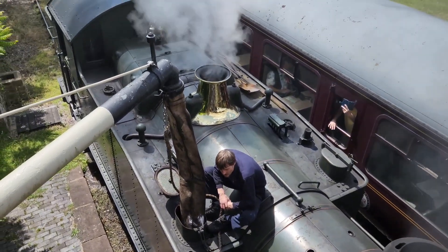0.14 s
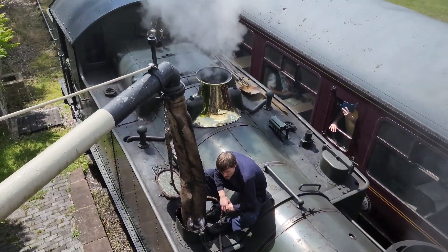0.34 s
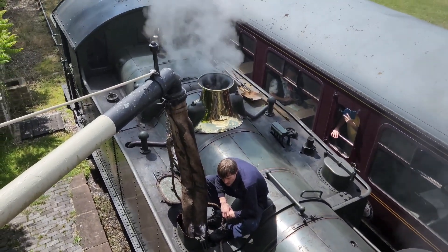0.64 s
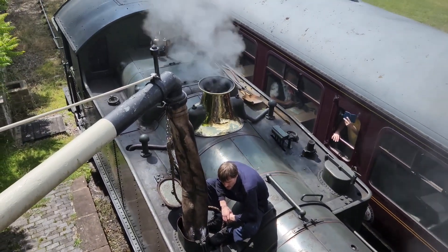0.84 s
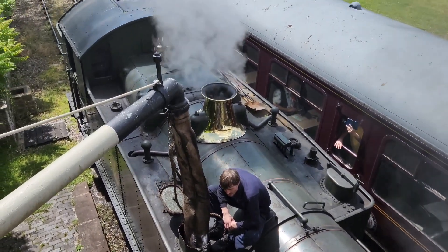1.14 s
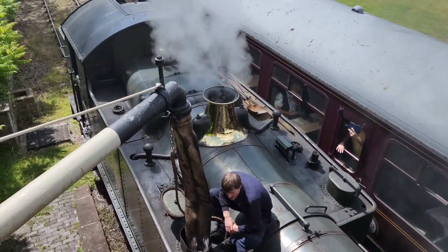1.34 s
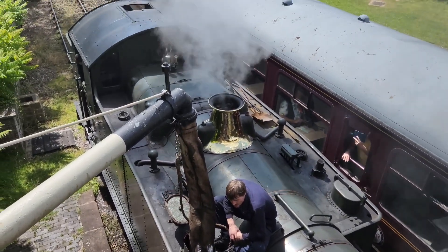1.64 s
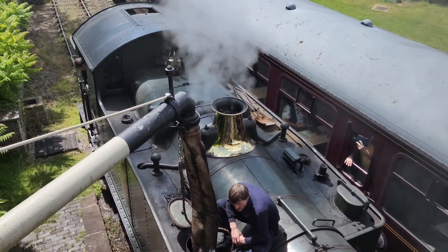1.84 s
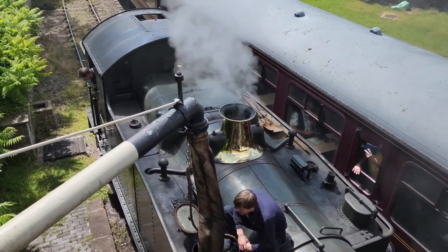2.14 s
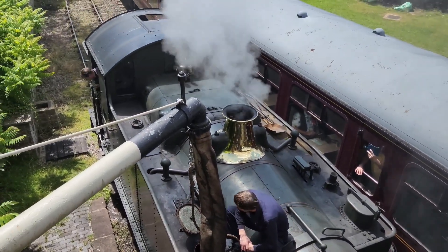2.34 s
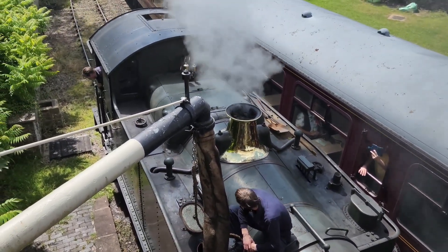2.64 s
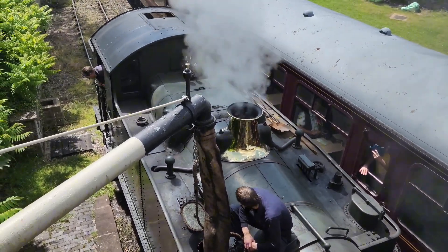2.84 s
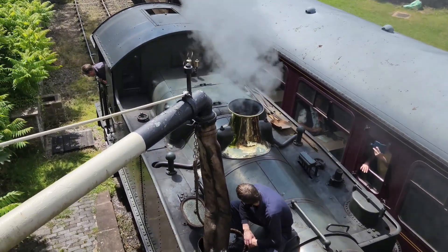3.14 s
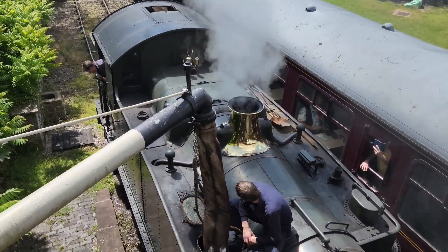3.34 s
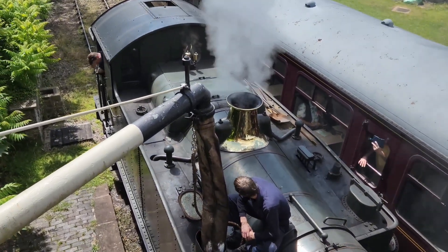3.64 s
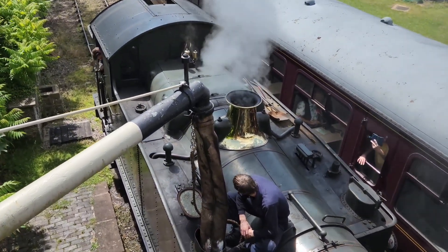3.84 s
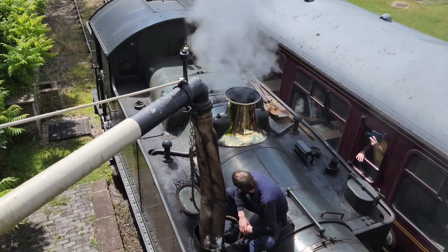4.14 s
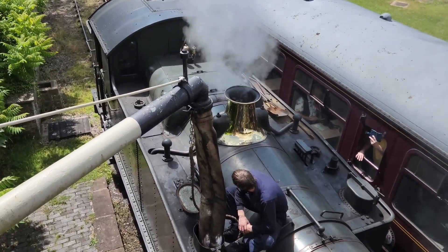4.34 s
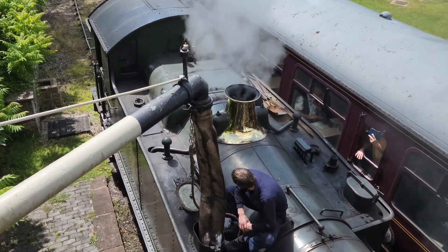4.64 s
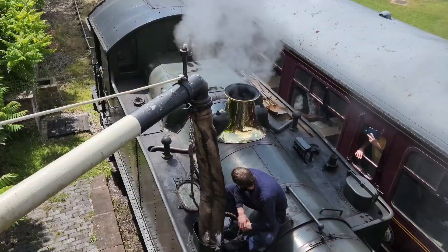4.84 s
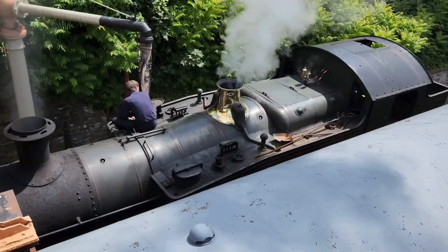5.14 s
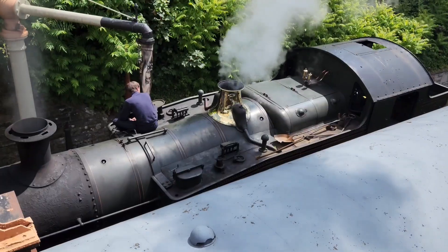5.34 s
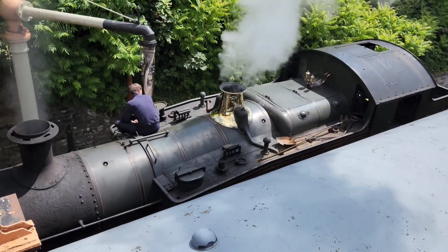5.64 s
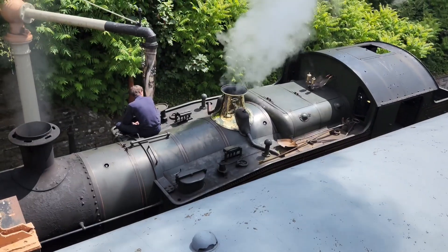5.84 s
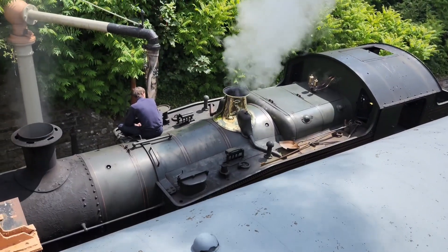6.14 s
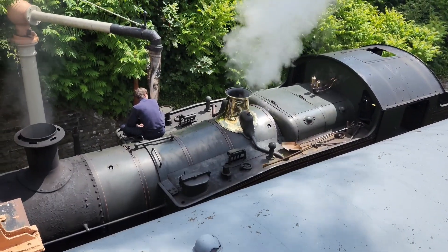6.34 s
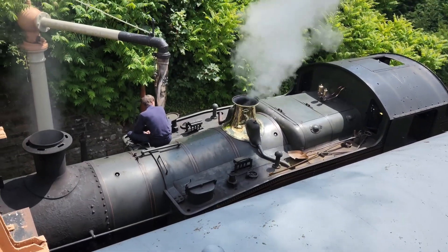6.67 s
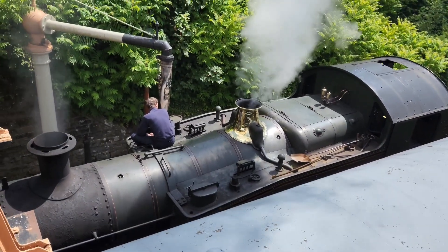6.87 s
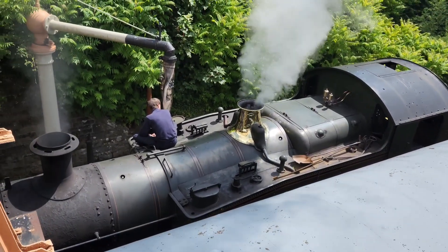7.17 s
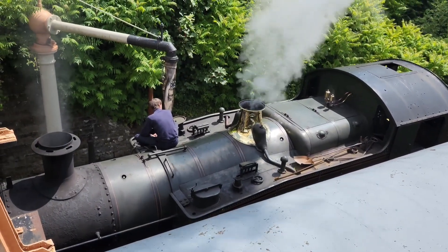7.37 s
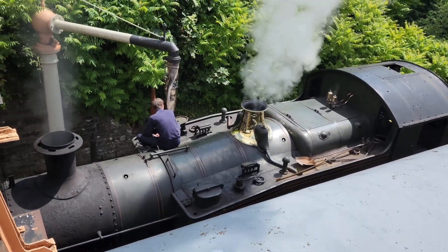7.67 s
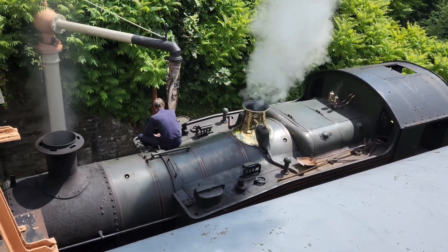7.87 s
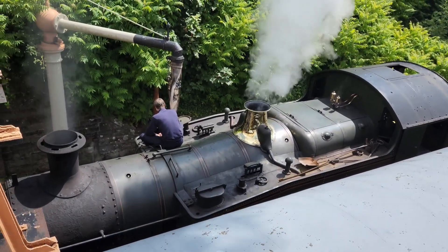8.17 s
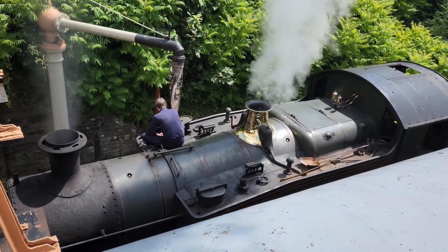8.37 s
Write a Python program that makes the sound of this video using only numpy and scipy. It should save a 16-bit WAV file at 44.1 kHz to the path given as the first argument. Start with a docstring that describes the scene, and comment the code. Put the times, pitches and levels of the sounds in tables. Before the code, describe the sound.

Continuous roaring steam escapes from safety valves, rumbling underneath and wavering with soft low tones, briefly cut before continuing from another position.

```python
"""A standing steam locomotive blows off through its safety valves, heard from above: filtered noise is the jet.
Front, 0-5.05 s: hissing jet, rumbling plume, faint bonnet tone swelling into hoots, three low air buffets.
The sound drops out for about 46 ms after a short decaying tail.
Side, from 5.1 s: the jet in another colour, a hollow ring at 5.4 s, a quick microphone swing at 6.4 s and
one more buffet. Slow turning of the two microphone ports shifts lag, balance and treble throughout."""
import sys
import numpy as np
from scipy import signal
from scipy.fft import rfft, irfft
from scipy.io import wavfile
from scipy.ndimage import uniform_filter1d, map_coordinates

SR = 44100
rng = np.random.default_rng(int(sys.argv[2]) if len(sys.argv) > 2 else 0)


def to_wav(s):
    """Save 16-bit WAV."""
    ch = np.atleast_2d(s).T  # columns
    pcm = np.round(np.clip(ch, -1, 1) * 32767)  # PCM
    wavfile.write(sys.argv[1], SR, pcm.astype(np.int16))


N = 375291
TIME = np.arange(N) / SR
FREQ = np.maximum(np.arange(N // 2 + 1) * SR / N, 1)

FRONT_END_S, SIDE_START_S = 5.054, 5.1005
TOP_HZ = 15750
JET_DB_PER_HZ = -55  # noise density before colour and resonances

# turning of the microphone: (time [s], lag of left port behind right [ms])
PORT_LAG_MS = [(0.0, -0.014), (1.3, -0.0094), (2.1, 0.031), (2.7, 0.042), (4.2, -0.014), (5.2, -0.00033),
               (5.8, 0.021), (6.45, 0.031), (6.7, 0.055), (7.05, 0.056), (7.4, 0.039), (8.5, 0.046)]


def amp(db):
    """Decibels to gain."""
    return 10 ** (np.asarray(db) / 20)


def curves(table):
    """Columns of a time table, interpolated at every sample."""
    time_s, *columns = np.transpose(table)
    return [np.interp(TIME, time_s, column) for column in columns]


def spectra(table):
    """Columns of a frequency table, interpolated on a log-frequency axis."""
    hz, *columns = np.transpose(table)
    return np.array([np.interp(np.log(FREQ), np.log(hz), column) for column in columns])


def walk(rate_hz):
    """Random levels, each held 1 / rate, joined by ramps; zero mean, standard deviation 1."""
    hold = max(int(SR / rate_hz), 2)
    levels = rng.standard_normal(N // hold + 2)
    steps = np.repeat(levels, hold)[rng.integers(hold):][:N]
    smooth = uniform_filter1d(steps, hold)
    return (smooth - smooth.mean()) / smooth.std()


def below(x, edge_hz):
    """Zero-phase low-pass with a soft edge, -6 dB at edge_hz."""
    return irfft(rfft(x) / (1 + (FREQ / edge_hz) ** 4), N)


def narrow(hz, width_hz):
    """Noise through one narrow resonance, width taken at -6 dB; rms 1."""
    resonance = 1 / (1 + (2 * (FREQ - hz) / width_hz) ** 2)
    x = irfft(rfft(rng.standard_normal(N)) * resonance, N)
    return x / x.std()


def buffets(hz=42, width_hz=30, apart_db=-7):
    """Puffs of air thud softly on the ports: shared low noise plus a weaker opposed part."""
    # low puffs: (peak time [s], half-length to 1/e [s], rms level of shared part at peak [dB])
    puffs = [(1.15, .25, -42), (2.2, .2, -50), (4.75, .2, -51), (6.9, .35, -43)]
    swell = sum(amp(db) * np.exp(-((TIME - peak_s) / length_s) ** 2) for peak_s, length_s, db in puffs)
    shared = narrow(hz, width_hz)
    opposed = amp(apart_db) * np.outer([1, -1], narrow(hz, width_hz))
    return swell * (shared + opposed)


def ring(width_hz=32, peak_s=5.38, length_s=0.077):
    """Two narrow noise bands swell and fade as a short hollow ring under the hiss."""
    # ring bands: (frequency [Hz], rms level at peak [dB])
    bands = [(482, -40), (545, -41)]
    tones = sum(amp(db) * narrow(hz, width_hz) for hz, db in bands)
    return tones * np.exp(-((TIME - peak_s) / length_s) ** 2)


def drone(hz=224, wander_hz=1.8, idle_db=-39, attack_s=0.047, release_s=0.13, pan_db=2.0):
    """The jet blows the bonnet like a bottle: a faint wavering sine that now and then swells and dies away."""
    # hoots: (hold start [s], hold length [s], rms level before pan [dB])
    hoots = [(0.204, 0.24, -31.5), (0.95, 0.2, -32.5), (1.326, 0.063, -27.5), (1.862, .1, -32.5),
             (2.86, 0.27, -36), (3.255, 0.13, -31.5), (3.552, 0.35, -32), (4.12, 0.57, -35.5),
             (4.778, 0.31, -33.5)]
    pitch_hz = hz + wander_hz * walk(5)
    tone = np.sqrt(2) * np.sin(2 * np.pi * np.cumsum(pitch_hz) / SR)
    swell = amp(idle_db)
    for start_s, hold_s, db in hoots:
        corners_s = np.cumsum([start_s - attack_s, attack_s, hold_s, release_s])
        swell = np.maximum(swell, amp(db) * np.interp(TIME, corners_s, [0, 1, 1, 0]))
    return tone * swell * amp(np.array([[pan_db], [-pan_db]]) / 2)


def jet(colour, resonances, likeness, low_depth=1, scatter=1, low_hz=2200):
    """Mixing noise of the jet at one place: a part shared by both ports and a part of opposite sign."""
    db = spectra(colour) + JET_DB_PER_HZ
    for hz, width_hz, left_db, right_db in resonances:
        depth = low_depth if hz < low_hz else 1
        bump = np.exp(-2 * ((FREQ - hz) / width_hz) ** 2)
        db = db + depth * np.outer([left_db, right_db], bump)
    alike = np.clip(1 - scatter * (1 - spectra(likeness)[0]), -1, 1)
    shared, scattered = rfft(rng.standard_normal((2, N)))
    ports = shared * np.sqrt(1 + alike) + np.outer([1, -1], scattered * np.sqrt(1 - alike))
    return irfft(ports * amp(db) * np.sqrt(SR) / 2, N)  # unit density per Hz at 0 dB


def front_jet():
    """Jet noise coloured as heard from the front."""
    # broad colour: (frequency [Hz], left [dB], right [dB])
    colour = [(25, -15.0, -14.9), (50, -4.5, -7), (96, 6, 3.5), (176, 5, 2.5), (302, -3, -7),
              (432, -8, -13), (764, -1.5, -6), (1410, -6.5, -1.5), (2210, 1.5, -2.4), (4530, 2.5, -1.8),
              (7000, -1.3, -2), (9800, -0.5, -4), (13000, -1, 0.7), (15800, 0.5, -2)]
    # bonnet, surface and port resonances: (frequency [Hz], width, 2 sigma [Hz], left [dB], right [dB])
    resonances = [(210, 23, 2.5, 2), (314, 27, 4, 4.5), (381.7, 17, 4.5, 11), (649, 50, 5, 7.5),
                  (855, 50, -5, -4), (1050, 81, 7.5, -5), (1235, 120, 7, 1.5), (1440, 38, 8, 6),
                  (1920, 270, 4.5, -4), (2110, 82, 2, 7), (2480, 76, 3.5, 7), (2960, 230, 1.5, 3),
                  (3830, 330, 0, 4.5), (4520, 365, -1.5, 4.5), (7270, 450, 6, 1.5), (8700, 900, 4, 2),
                  (9900, 720, -4, 2.5), (11534, 730, 1.5, 2)]
    # likeness of the ports: (frequency [Hz], correlation [-1..1])
    likeness = [(100, 1), (300, 0.9), (500, 0.89), (1200, 0.73), (1700, 0.5), (2200, 0.49), (5000, 0.61),
                (6800, 0.45), (8000, 0.27), (9400, 0.37), (11000, 0.71), (12700, 0.074), (15000, 0.54)]
    return jet(colour, resonances, likeness)


def side_jet(swing_s=6.42, swing_length_s=0.26):
    """Jet noise at the side; one microphone swing strengthens lower resonances and makes the ports more alike."""
    # broad colour: (frequency [Hz], left [dB], right [dB])
    colour = [(25, -14, -13), (50, -6, -4), (103, 3.5, 1), (184, 1, -1), (320, -2.0, -7.5),
              (427, -12, -15.5), (765, -5.5, -5), (1400, -3, -4), (2210, -2, -2.4), (4500, -2, -4),
              (7000, -0.5, -6.5), (10000, -0.6, -5.5), (13000, 0, -1.5), (15800, -2, -1.5)]
    # resonances before low_depth: (frequency [Hz], width, 2 sigma [Hz], left [dB], right [dB])
    resonances = [(769, 49, 5, 4), (1010, 170, 3, -3), (1210, 75, 7, 5.5), (1385, 220, -2.5, -9.5),
                  (1940, 200, 5, 3.5), (2430, 130, 6, 1), (2800, 198, 3, -1), (3570, 690, 3, 2.5),
                  (4690, 300, 3, 4), (5350, 280, 4.5, 2), (6260, 480, 3.5, 5), (7320, 590, 3.5, 4.5),
                  (8500, 820, 3, 3), (9600, 610, -6.5, 1.5), (11500, 590, -3, 4)]
    # likeness of the ports before scatter: (frequency [Hz], correlation [-1..1])
    likeness = [(100, 1), (300, 0.96), (480, 0.64), (800, 0.99), (1450, 0.8), (1800, 0.85), (3000, 0.62),
                (4500, 0.89), (7200, 0.21), (8400, 0.6), (9400, 0.91), (10000, 0.85), (11300, 0.16),
                (13000, 0.62), (15500, 0.7)]
    before = jet(colour, resonances, likeness, low_depth=0.8, scatter=1.05)
    after = jet(colour, resonances, likeness, low_depth=1.13, scatter=0.88)
    swung = np.clip((TIME - swing_s) / swing_length_s, 0, 1)
    return before * np.sqrt(1 - swung) + after * np.sqrt(swung)


def shimmer(x, depth_db, rate_hz, count=14):
    """Hot moving air bends the sound: neighbouring bands of the hiss fade and swell independently."""
    centres_hz = np.geomspace(800, TOP_HZ, count)
    spectrum, out = rfft(x), 0
    for share in np.eye(count):
        band = irfft(spectrum * np.interp(FREQ, centres_hz, share), N)  # triangular band
        out = out + band * amp(depth_db * walk(rate_hz))
    return out


def turbulence(steam, rumble_hz=500, surge_db=0.11, surge_hz=9, sputter_db=0.6, sputter_hz=55):
    """Big eddies rumble with the slow flow; the hiss surges and sputters as a whole."""
    # slow drift of jet strength: (time [s], plume rumble [dB], hiss [dB])
    flow = [(0.0, -0.5, -0.54), (1.2, 1.3, -0.24), (1.47, -0.8, 0.7), (1.75, 0.1, -0.35), (2.9, 0, 0),
            (4.1, 0.5, -0.4), (4.9, 1.4, -0.0), (5.6, 0, 0.2), (6.3, 0.8, 0.84), (7.2, -1, 0.6),
            (8.5, -1, 0.9)]
    rumble_db, hiss_db = curves(flow)
    rumble = below(steam, rumble_hz)
    hiss = shimmer(steam - rumble, depth_db=0.74, rate_hz=11)
    unrest_db = surge_db * walk(surge_hz) + sputter_db * walk(sputter_hz)
    return rumble * amp(rumble_db) + hiss * amp(hiss_db + unrest_db)


def reflections(x, echo_db=-27, first_s=0.000992, last_s=0.012, drift_s=0.00006, from_hz=1700, count=20):
    """Tank tops, cab and carriage return the hiss within milliseconds; drifting paths comb it finely."""
    treble, out = x - below(x, from_hz), x
    for delay_s in rng.uniform(first_s, last_s, count):
        source_s = TIME - delay_s - drift_s * walk(1.2)
        echo = np.array([np.interp(source_s, TIME, port) for port in treble])
        out = out + amp(echo_db) * echo
    return out


def off_axis():
    """Microphone turn as port lag [ms] relative to its mean at each place."""
    lag_ms, in_front = curves(PORT_LAG_MS)[0], TIME < SIDE_START_S
    return lag_ms - np.where(in_front, lag_ms[in_front].mean(), lag_ms[~in_front].mean())


def turn(x, sizzle_hz=7500, brighten_db_per_ms=28, waver_db=0.5, waver_hz=5, shade_db_per_ms=20):
    """As lag grows, the left port hears the jet later and weaker, and the wavering top of the hiss brightens."""
    turned_ms, body = off_axis(), below(x, sizzle_hz)
    sizzle_db = brighten_db_per_ms * turned_ms + waver_db * walk(waver_hz)
    x = body + (x - body) * amp(sizzle_db)
    lag_samples = curves(PORT_LAG_MS)[0] * SR / 1000
    left = map_coordinates(x[0], [np.arange(N) - lag_samples], order=5, mode="mirror")
    lean = amp(shade_db_per_ms * turned_ms / 2)  # half the level difference on each port
    return np.array([left / lean, x[1] * lean])


def scene(tail_db=-14, tail_t60_s=0.028):
    """The jet from the front, a brief dropout, the jet from the side."""
    in_front = TIME < SIDE_START_S
    steam = turn(reflections(turbulence(np.where(in_front, front_jet(), side_jet()))))
    mix = steam + np.where(in_front, drone(), ring()) + buffets()
    # the sound stops short, leaving a tail of a few milliseconds
    tail = amp(tail_db - 60 * np.maximum(TIME - FRONT_END_S, 0) / tail_t60_s)
    return mix * np.where((TIME < FRONT_END_S) | (TIME > SIDE_START_S), 1, tail)


def record(dry):
    """Steep elliptic low-pass: 0.1 dB ripple, 80 dB stopband."""
    return signal.sosfilt(signal.ellip(12, 0.1, 80, TOP_HZ, fs=SR, output="sos"), dry)


dry = scene()
out = record(dry)
to_wav(out)
```